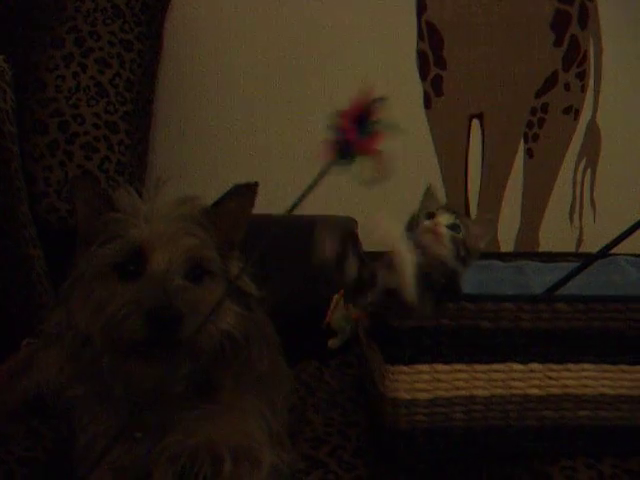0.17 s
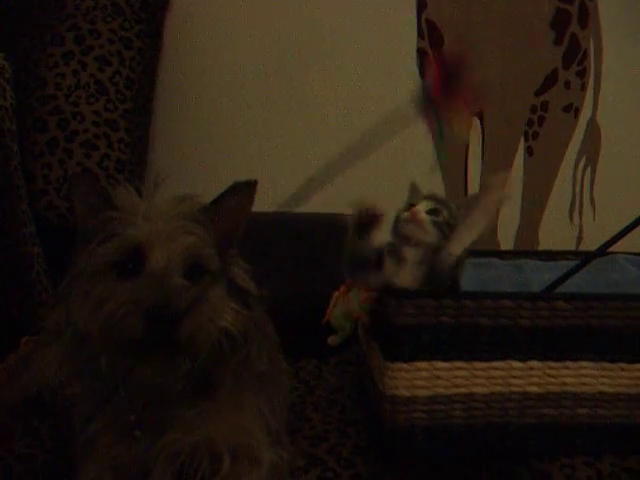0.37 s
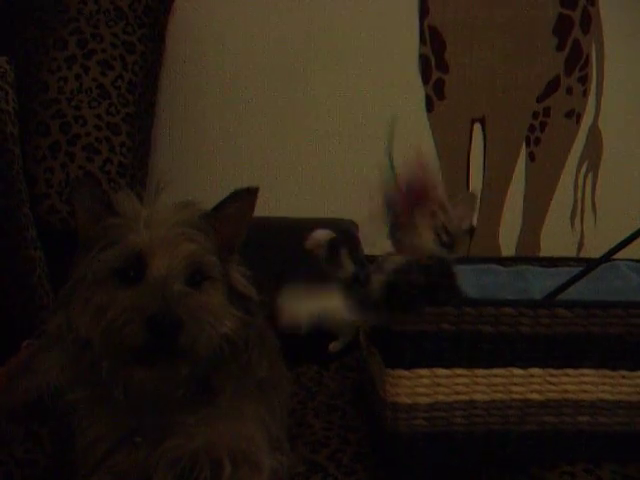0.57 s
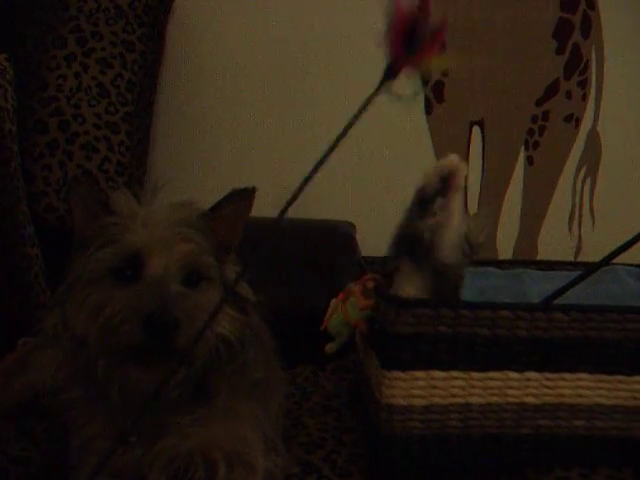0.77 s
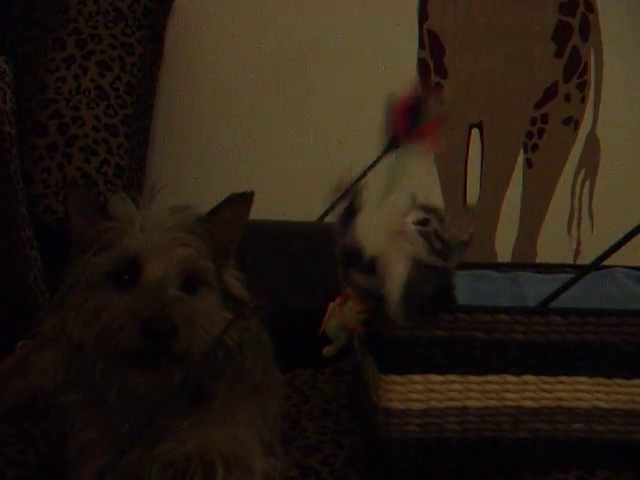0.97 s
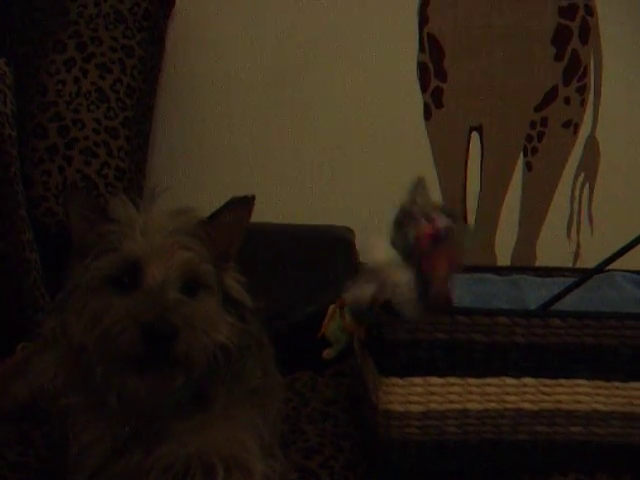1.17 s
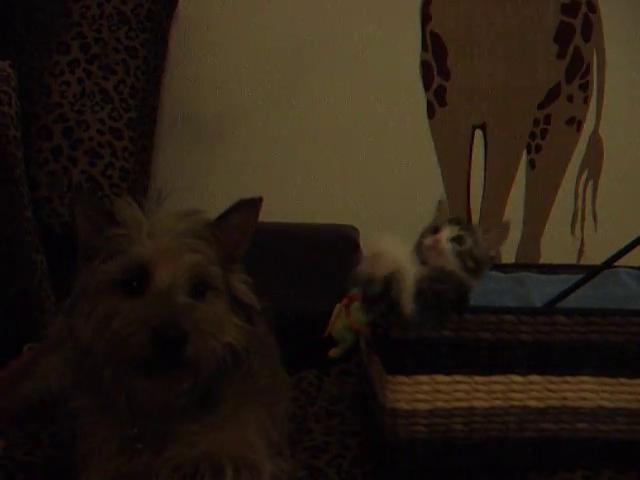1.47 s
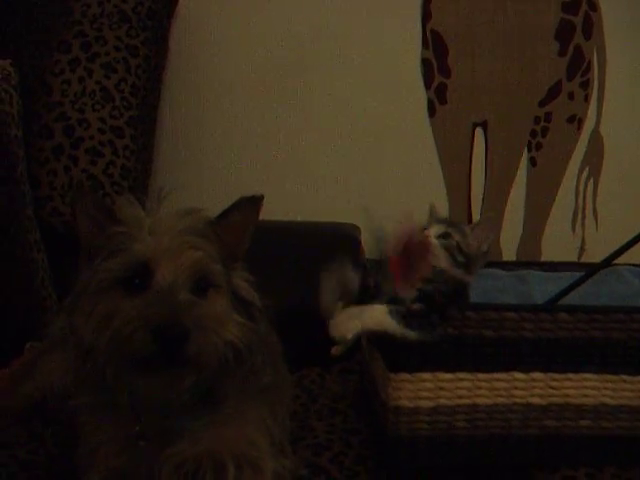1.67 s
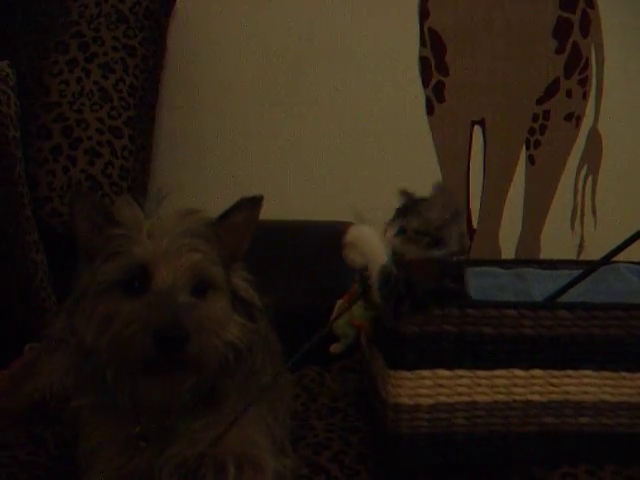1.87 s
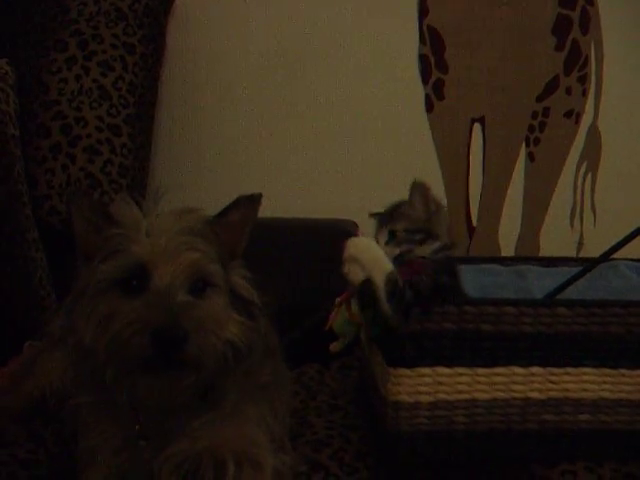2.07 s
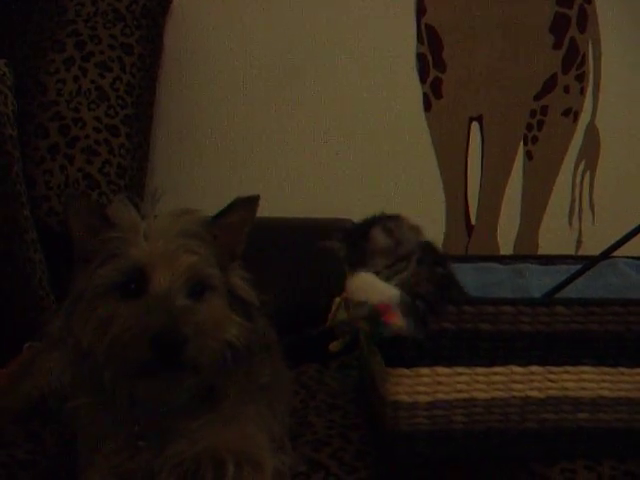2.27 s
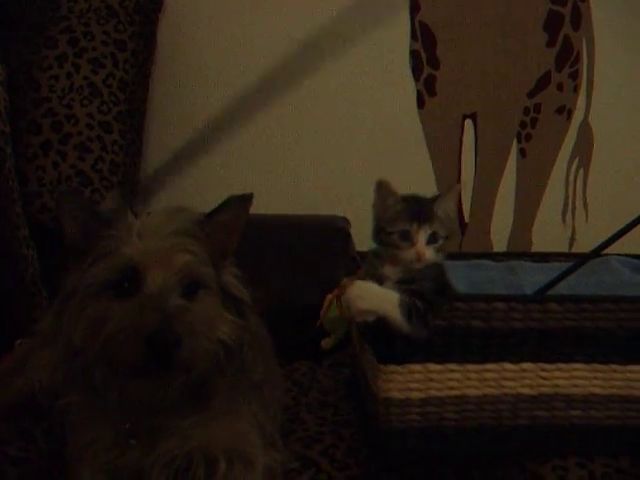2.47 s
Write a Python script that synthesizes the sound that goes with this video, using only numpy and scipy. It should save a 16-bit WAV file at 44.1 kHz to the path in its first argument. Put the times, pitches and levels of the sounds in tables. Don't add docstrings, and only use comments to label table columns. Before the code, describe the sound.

A small toy bell rattles faintly as a kitten bats it, with scratches, a knock and hiss

```python
import sys
import numpy as np
from scipy import signal
from scipy.fft import rfft, irfft
from scipy.io import wavfile

SR = 44100
rng = np.random.default_rng(int(sys.argv[2]) if len(sys.argv) > 2 else 0)


def natural_amplitude(level_db):
    exponent = np.asarray(level_db, float) / 20
    return 10 ** exponent


def dump_mix(stems):
    frames = np.atleast_2d(stems).T
    limited = np.clip(frames, -1, 1)
    pcm = np.round(limited * 32767).astype(np.int16)
    wavfile.write(sys.argv[1], SR, pcm)


N = 115983
T = np.arange(N) / SR
RECORDER_HZ = 16000


def rms_one(x):
    return x / np.sqrt(np.mean(x ** 2) + 1e-20)


def drift(rate_hz):
    knots = rng.standard_normal(200)
    return np.interp(T * rate_hz, np.arange(200), knots)


def coloured(x, spectrum):
    hz, db = np.transpose(spectrum)
    f = np.maximum(np.fft.rfftfreq(N, 1 / SR), 1)
    gain = natural_amplitude(np.interp(np.log(f), np.log(hz), db))
    in_band = (f > 12) * (f < RECORDER_HZ / 2)
    return rms_one(irfft(rfft(x) * gain * in_band, N))


def sine(hz):
    return np.sqrt(2) * np.sin(2 * np.pi * hz * T)


def room_tone():
    # hz, level_db (per Hz)
    tone_colour = [(20, 8.5), (45, 10.5), (62, 0.5), (110, 5), (800, 0.5), (1600, -4.5), (5200, -5),
                   (7600, 1)]
    level_db = -57 + 1.0 * drift(14)
    noise = natural_amplitude(level_db) * coloured(rng.standard_normal(N), tone_colour)

    frames_per_s = 29.5
    turn = np.pi * frames_per_s * T
    flip = rms_one(np.cos(turn) - natural_amplitude(-7) * np.cos(3 * turn))
    whine = natural_amplitude(-63.5) * flip * sine(7692.3)
    hum = natural_amplitude(-77.5) * sine(200)
    return noise + whine + hum


def hand_bumps():
    # crest_s, peak_db, pitch_hz
    shifts = [(.699, -53, 42.8), (.741, -56.5, 43.7), (0.801, -59.5, 45.8), (1.014, -51.5, 54.2),
              (1.065, -57.5, 48.6), (1.194, -55.5, 28.55), (1.241, -61, 43), (1.276, -48, 61.4),
              (1.367, -57.5, 48.5), (1.427, -54, 35.9), (1.473, -56, 38.1), (1.786, -50.5, 95.4),
              (1.86, -59, 55.2), (1.907, -51.5, 31.7), (1.944, -62.5, 39.1), (2.235, -60.5, 71.4),
              (2.262, -56, 66.4)]
    half_width_cycles = 0.9
    out = np.zeros(N)
    for crest_s, db, hz in shifts:
        t = T - crest_s
        envelope = np.exp(-(t * hz / half_width_cycles) ** 2)
        out += natural_amplitude(db) * envelope * np.cos(2 * np.pi * hz * t)
    return out


def swishes():
    # start_s, swell_s, fade_s, level_db
    strokes = [
        (1.109, 0.02, 0.0094, -52),
        (1.247, 0.018, 0.025, -55.5),
        (1.315, 0.0072, .03, -55.5),
        (1.373, 0.01, 0.048, -53),
        (2.041, .07, 0.035, -54.5),
        (2.119, .045, 0.0062, -48.5),
        (2.288, 0.069, .055, -50),
    ]
    # hz, level_db (per Hz)
    fibre_colour = [(800, -14), (2000, -3.5), (4000, -3), (6000, 0), (7600, -1)]
    fibres_per_s, spread_db = 7000, 2.5
    level = np.zeros(N)
    for start_s, swell_s, fade_s, db in strokes:
        crest_s = start_s + swell_s
        level += natural_amplitude(db) * np.interp(T, [start_s, crest_s, crest_s + fade_s], [0, 1, 0])
    clicks = rng.random(N) < fibres_per_s / SR
    strength = natural_amplitude(spread_db * np.minimum(rng.exponential(1, N), 3.0))
    fibres = clicks * strength * rng.choice([-1, 1], N)
    return level * coloured(fibres, fibre_colour)


def contact_swell(crest_s, rise_s, fall_s):
    near = slice(int((crest_s - .01) * SR), int((crest_s + .02) * SR))
    t = T[near] - crest_s
    return near, t, np.exp(-(t / np.where(t < 0, rise_s, fall_s)) ** 2)


def add_tap(out, crest_s, db, hz, rise_s, fall_s):
    near, t, shape = contact_swell(crest_s, rise_s, fall_s)
    out[near] += natural_amplitude(db) * shape * np.cos(2 * np.pi * hz * t)


def basket_knocks():
    # crest_s, peak_db, pitch_hz
    paw_hits = [
        (0.2581, -47.5, 200),
        (1.7643, -35.5, 530),
        (1.7676, -40, 900),
        (1.7747, -32, 709),
        (1.7764, -43.5, 217),
        (1.8049, -50, 303),
    ]
    rise_cycles, fall_cycles = .6, .65
    out = np.zeros(N)
    for crest_s, db, hz in paw_hits:
        add_tap(out, crest_s, db, hz, rise_cycles / hz, fall_cycles / hz)
    return out


def claw_snaps():
    # crest_s, peak_db, pitch_hz
    catches = [(0.2706, -49.5, 3420), (0.7176, -38.5, 5050), (0.8498, -35, 5640), (0.9914, -40.5, 6080),
               (0.9963, -40, 6160), (1.0306, -42, 3330), (1.2098, -40, 3530), (1.2968, -39, 3950),
               (1.306, -41.5, 5500), (1.663, -43.5, 6040), (1.7631, -29, 5690), (1.7653, -35, 4690),
               (1.7685, -36.5, 4010), (1.774, -44.5, 2850), (1.799, -42.5, 5960), (2.316, -41.5, 4500)]
    rise_s, fall_s, octaves = 0.00033, 0.001, .6
    out, noise = np.zeros(N), rng.standard_normal(N)
    for crest_s, db, hz in catches:
        near, _, shape = contact_swell(crest_s, rise_s, fall_s)
        edges_hz = [hz / 2 ** octaves, hz * 2 ** (octaves / 2)]
        band = signal.butter(2, edges_hz, "band", fs=SR, output="sos")
        burst = shape * signal.sosfilt(band, noise[near])
        out[near] += natural_amplitude(db) * burst / np.abs(burst).max()
    return out


def ring(clicks, hz, t60_s):
    r, w = natural_amplitude(-60 / (t60_s * SR)), 2 * np.pi * hz / SR
    return signal.lfilter([0, np.sin(w)], [1, -2 * r * np.cos(w), r * r], clicks + 1e-18)


def bell(strikes, modes):
    rise_s, fall_s = .00035, .00065
    lift_db, sharpening = -.4, 1.012
    start_s, db, hz = np.transpose(strikes)
    chance = rng.standard_normal((len(start_s), len(modes)))
    out = np.zeros(N)
    for tick_s, tick_db, tick_hz in zip(start_s, db + lift_db, hz * sharpening):
        add_tap(out, tick_s, tick_db, tick_hz, rise_s, fall_s)
    for k, (mode_hz, mode_db, t60_s) in enumerate(modes):
        clicks = np.zeros(N)
        clicks[(start_s * SR).astype(int)] = natural_amplitude(db + mode_db + 2.5 * chance[:, k])
        out += ring(clicks, mode_hz, t60_s)
    return out


def low_bell():
    # crest_s, peak_db, pitch_hz
    pellet_hits = [(2.4212, -39, 6300), (2.4237, -41, 6390), (2.4283, -22, 6550), (2.4315, -33, 6460),
                   (2.4376, -40, 6540), (2.4394, -42, 6330), (2.4412, -38, 6360), (2.4434, -40, 6400),
                   (2.448, -30, 6570), (2.4607, -40, 6510)]
    # pitch_hz, level_db, t60_s
    tuning = [(6030, -32, .3), (6110, -32, .25), (6180, -30, .35), (6250, -30, .3), (6337, -31, .3),
              (6830, -23, .025), (7050, -24, .02)]
    return bell(pellet_hits, tuning)


def high_bell():
    # crest_s, peak_db, pitch_hz
    pellet_hits = [(0.1634, -33, 7230), (0.1655, -40, 7170), (0.1671, -29, 7610), (0.1731, -31, 7100),
                   (0.1749, -39, 7330), (0.8928, -37, 7620), (0.8967, -36, 7580), (0.9386, -35, 7480),
                   (0.953, -40, 7310), (0.9943, -41, 7470), (1.024, -40, 6910), (1.0301, -38, 7080),
                   (1.034, -34, 7420), (1.0391, -37, 7410), (1.3208, -41, 7540), (1.5817, -41, 7530),
                   (1.6137, -35, 7250), (1.6179, -37, 7350), (1.6211, -30, 7370), (1.6248, -33, 7550),
                   (1.6309, -37, 7300), (1.633, -34, 7230), (2.0065, -37, 7100), (2.0119, -33, 7300),
                   (2.0155, -39, 7000), (2.0265, -28, 7440), (2.0301, -33, 7340), (2.0345, -40, 7150)]
    # pitch_hz, level_db, t60_s
    tuning = [(7180, -25.5, .1), (7260, -25, 0.13), (7462, -23.5, .14), (7652, -22, .14), (7865, -20.5, .1),
              (7920, -23, .08)]
    return bell(pellet_hits, tuning)


def room(x):
    t60_s, level_db, first_reflection_s = 0.23, -12, .004
    t = T[:SR // 2]
    tail = rng.standard_normal(len(t)) * natural_amplitude(-60 * t / t60_s) * (t > first_reflection_s)
    return natural_amplitude(level_db) * signal.fftconvolve(x, tail / np.sqrt(np.sum(tail ** 2)))[:N]


def scene():
    play = swishes() + basket_knocks() + claw_snaps() + low_bell() + high_bell()
    mono = room_tone() + hand_bumps() + room(play) + play
    return np.array([mono, mono])


def band_limit(x):
    return signal.sosfilt(signal.butter(12, 9140, fs=SR, output="sos"), x)


def record(dry):
    step, bias_steps = np.sqrt(2) / 256, .07
    slow = signal.resample(dry[0], N * RECORDER_HZ // SR)
    stepped = step * np.floor(slow / step + bias_steps)
    back = signal.resample_poly(stepped, 441, 160, window=("kaiser", 3.83), padtype="edge")[:N]
    return band_limit(np.array([back, back]))


dry = scene()
out = record(dry)
dump_mix(out)
```